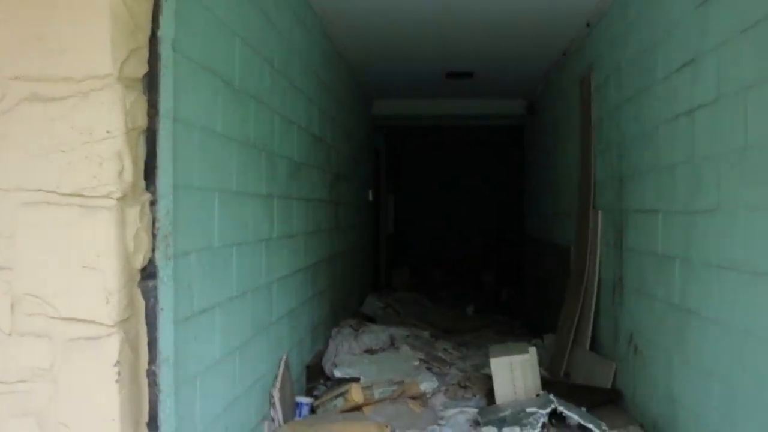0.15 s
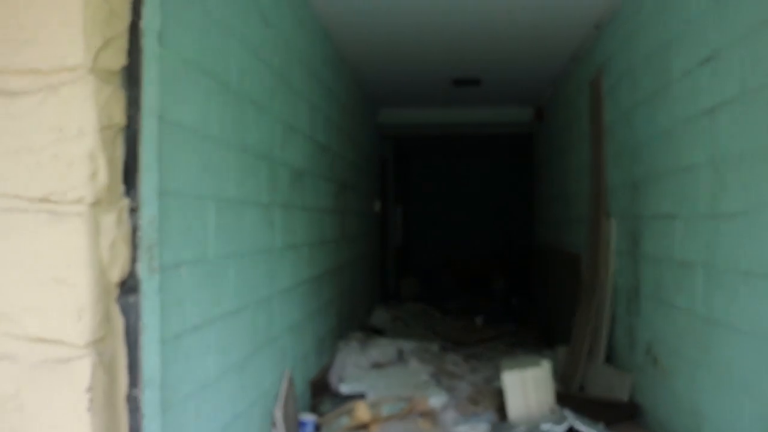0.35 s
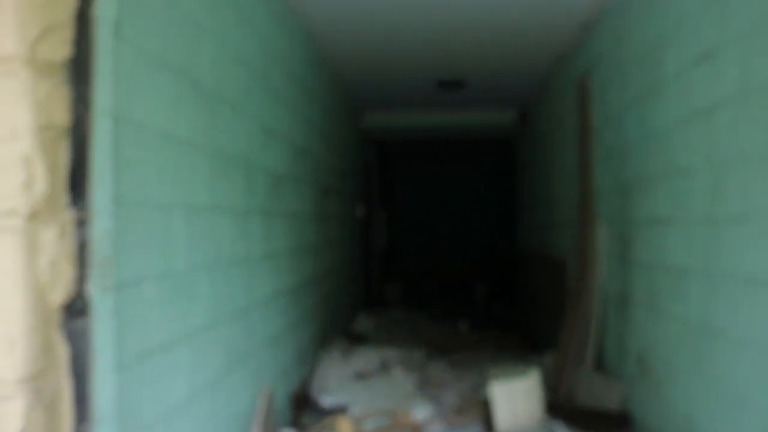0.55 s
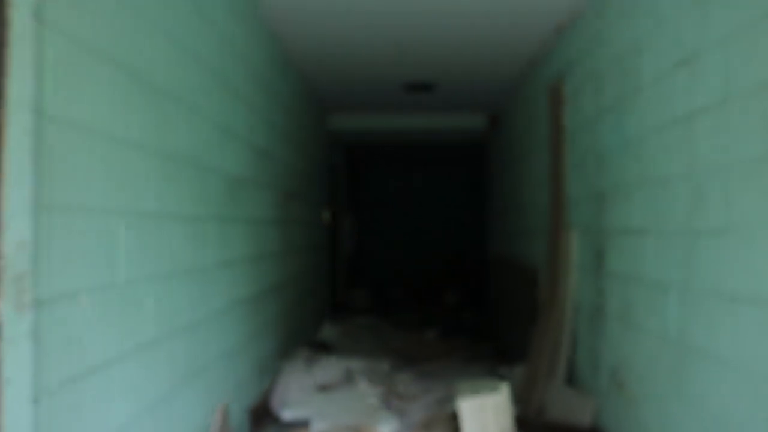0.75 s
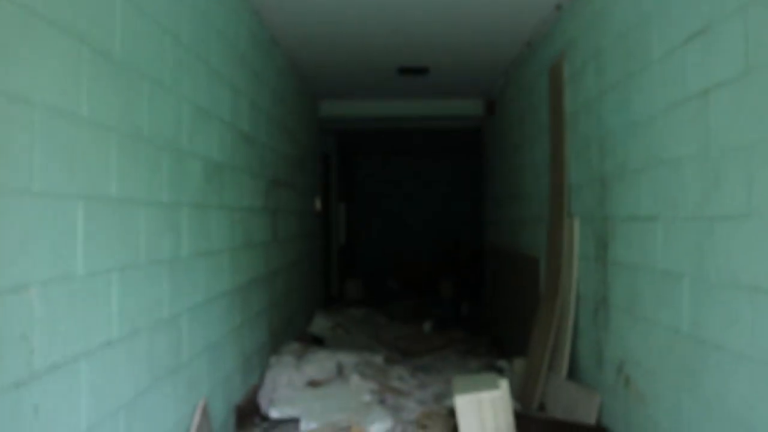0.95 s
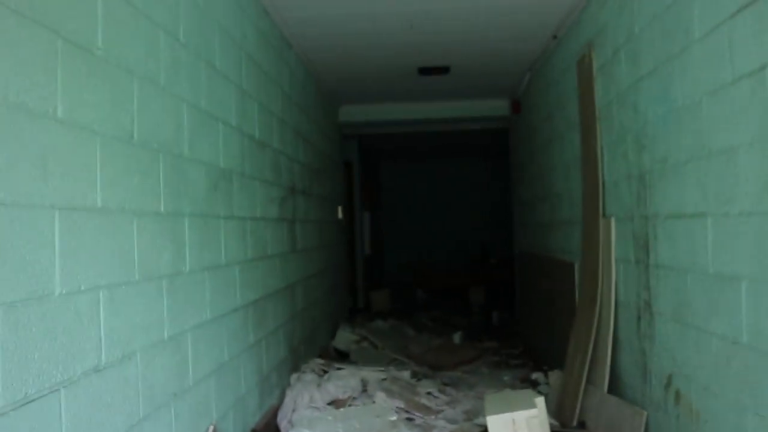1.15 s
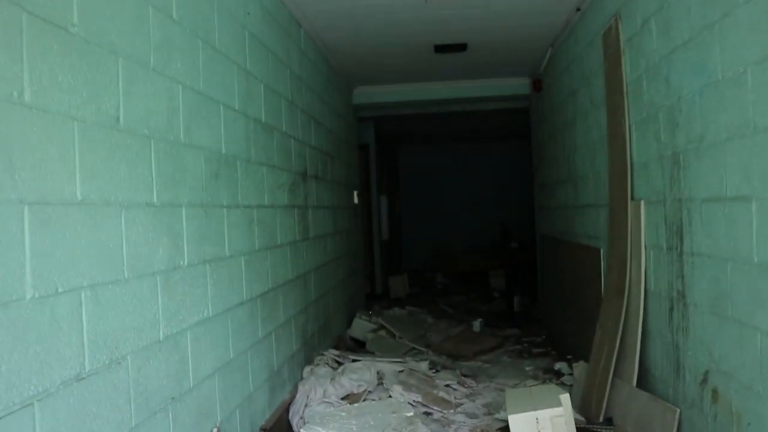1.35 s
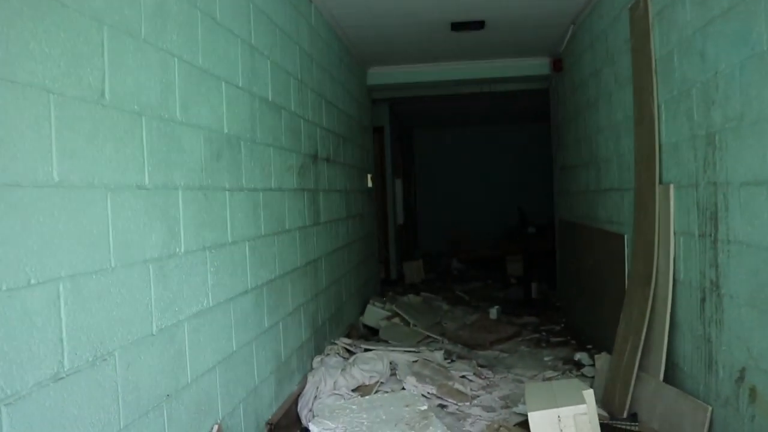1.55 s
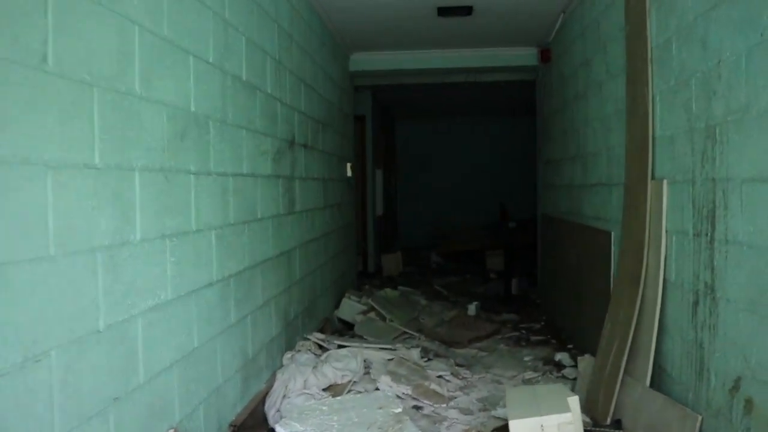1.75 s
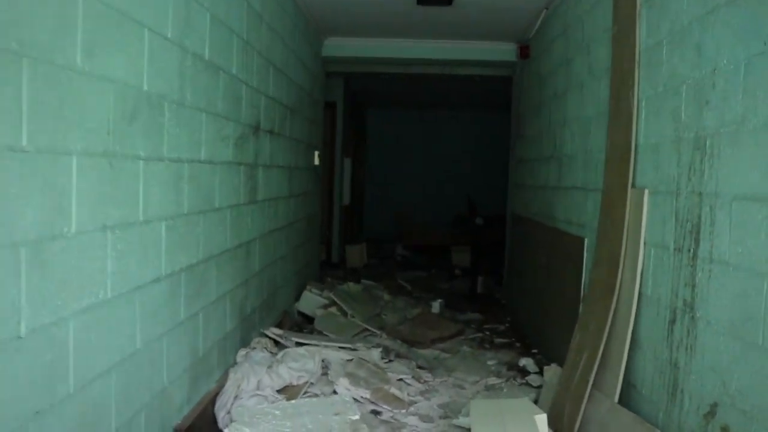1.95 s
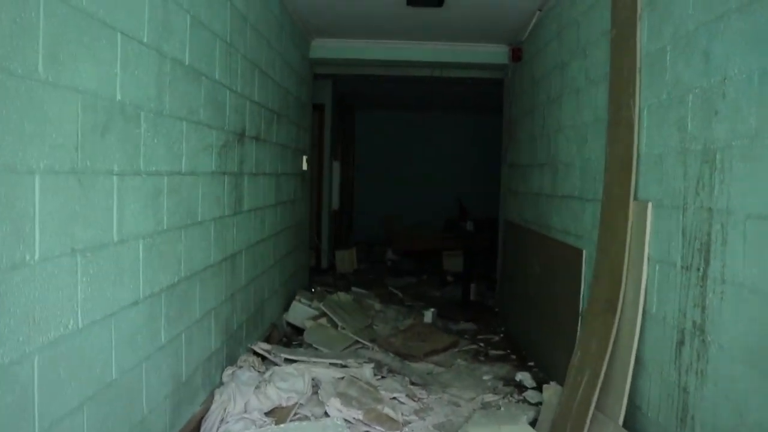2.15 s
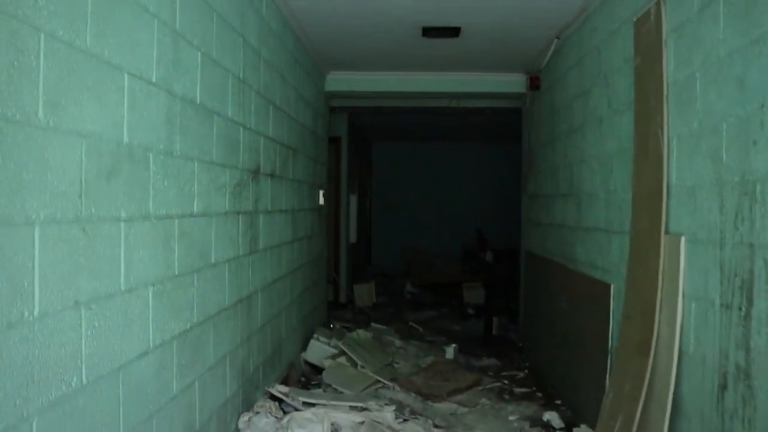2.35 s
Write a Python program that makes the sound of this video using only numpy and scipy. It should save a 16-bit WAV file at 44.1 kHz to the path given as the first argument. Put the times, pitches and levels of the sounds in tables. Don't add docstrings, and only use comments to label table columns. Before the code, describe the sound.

Slow steps crack debris and send broken glass tinkling inside a hard-walled, derelict hallway.

```python
import sys
import numpy as np
from scipy import signal
from scipy.fft import rfft, irfft, next_fast_len
from scipy.io import wavfile

SR = 44100
rng = np.random.default_rng(int(sys.argv[2]) if len(sys.argv) > 2 else 0)


def field_ratio(decibels):
    return 10 ** (np.asarray(decibels, dtype=float) / 20)


def put_to_file(sound):
    columns = np.atleast_2d(sound).T
    safe = np.clip(columns, -1, 1)
    whole_steps = np.round(safe * 32767)
    wavfile.write(sys.argv[1], SR, whole_steps.astype(np.int16))


N = 110250

GRIT_ALIKE_HZ = 2600


def rms_one(x):
    return x / np.sqrt(np.mean(x ** 2) + 1e-20)


def at_hz(points, hz, column=1):
    p = np.array(points)
    return np.interp(np.log(np.maximum(hz, 1)), np.log(p[:, 0]), p[:, column])


def flicker(rate, size, count):
    knots = rng.standard_normal((count, 60))
    t = np.arange(size) / SR
    return np.array([np.interp(t * rate, np.arange(len(k)), k) for k in knots])


def drift(rate):
    knots = rng.standard_normal(200)
    return np.interp(np.arange(N) / SR * rate, np.arange(len(knots)), knots)


def ring(clicks, hz, t60):
    radius = field_ratio(-60 / (t60 * SR))
    angle = 2 * np.pi * min(hz, 19000) / SR
    poles = [1, -2 * radius * np.cos(angle), radius * radius]
    return signal.lfilter([0, np.sin(angle)], poles, clicks + 1e-18)


def band(x, low_hz, high_hz):
    edges = [max(low_hz, 10), min(high_hz, 19800)]
    return signal.sosfilt(signal.butter(2, edges, "band", fs=SR, output="sos"), x)


def add(out, s, x, pan_db):
    i = int(s * SR)
    x = x[..., max(-i, 0):N - i]
    start = max(i, 0)
    out[:, start:start + x.shape[-1]] += x * field_ratio(np.array([[pan_db / 2], [-pan_db / 2]]))


# start t/s, length t/s, level/dB, centre f/Hz, width/octaves
SCUFF_EVENTS = [(-.02, 0.035, -36.5, 3300, 1.6), (.2405, 0.011, -28.5, 3850, 0.14),
                (.245, 0.077, -29, 5000, 1.64), (0.252, 0.049, -31, 990, 0.74),
                (0.404, 0.061, -30.5, 5480, 0.23), (0.39, 0.047, -32, 7450, 0.33),
                (0.399, 0.067, -41, 11300, 0.22), (.4, 0.048, -33.5, 2230, 0.4),
                (0.578, 0.0076, -27.5, 3430, 1.66), (0.823, 0.023, -43, 5000, 1.23),
                (1.069, 0.27, -48, 3020, 2.36), (1.194, 0.0094, -34, 5930, 0.48),
                (1.207, 0.052, -44.5, 4200, 1.16), (1.39, 0.056, -50, 449, 0.038),
                (1.51, 0.074, -55.5, 460, 0.035), (1.424, 0.013, -48, 11500, 0.13),
                (1.458, 0.027, -47.5, 530, 0.38), (1.638, 0.0067, -45, 1930, 0.77),
                (1.831, 0.013, -39.5, 367, 0.93), (1.797, 0.074, -49, 7000, 1.34),
                (1.882, 0.037, -45.5, 1180, 1.5), (2.0, 0.016, -46, 1500, 1.9),
                (2.056, 0.034, -50.5, 7850, 1.13), (2.097, 0.0067, -49, 1500, 0.65)]
SCUFF_RISE, SCUFF_FALL_S = 0.14, 0.021
GRAINS_PER_S, GRAIN_SPREAD_DB, GRAIN_CYCLES = 7000, 2, 10
CLUMP_DB, CLUMPS_PER_S = 4.5, 90
GRIT_TOP_HZ = 14500


def scuffs():
    out, size = np.zeros((2, N)), SR // 6
    t = np.arange(size) / SR
    draws = rng.random((len(SCUFF_EVENTS), 4, 3, size))
    steps = np.linspace(-1.5, 1.5, 10)
    for (s, length, db, hz, octaves), (born, big, sign, dealt) in zip(SCUFF_EVENTS, draws):
        sizes = field_ratio(-GRAIN_SPREAD_DB * np.log(np.maximum(big, 0.02)))
        grains = (born < GRAINS_PER_S / SR) * sizes * np.sign(sign - 0.5)
        rise = np.clip(t / (SCUFF_RISE * length), 0, 1)
        fall = np.exp(-np.maximum(t - length, 0) / SCUFF_FALL_S)
        grains = grains * rise * fall
        dealt = (dealt * len(steps)).astype(int)
        cycles = GRAIN_CYCLES / np.sqrt(octaves)
        clumps = field_ratio(CLUMP_DB * flicker(CLUMPS_PER_S, size, len(steps)) - CLUMP_DB / 2)
        grit = 0
        for k, step in enumerate(steps):
            pitch = min(hz * 2 ** (step * octaves), 15500)
            unit = np.sqrt(GRAINS_PER_S / len(steps) * cycles / pitch / 5)
            weight = np.exp(-step ** 2 / 2) / unit / (1 + (pitch / GRIT_TOP_HZ) ** 8)
            rung = ring(grains * clumps[k] * (dealt == k), pitch, cycles / pitch) * weight
            own = 1 / (1 + (GRIT_ALIKE_HZ / pitch) ** 2)
            grit = grit + np.sqrt(1 - own) * rung[0] + np.sqrt(own) * rung[1:]
        reach = 2 ** (1.5 * octaves + 0.5)
        add(out, s, field_ratio(db) * band(grit, hz / reach, hz * reach), 0)
    return out


# t/s, peak level/dB, f/Hz, ring/cycles, pan/dB
SNAP_EVENTS = [(.007, -16.5, 5900, 4, -1), (0.2338, -27, 3540, 7.8, -2), (0.2652, -15, 750, 5.2, 0),
               (0.3952, -4, 1048, 8.3, 1), (.397, -7.5, 2310, 5.7, 5.5), (0.4199, -13, 1297, 19, 7),
               (.450, -12, 1270, 11, 1), (0.5837, -23, 300, 2.1, 0.1), (0.5832, -3, 4800, 2.6, 7),
               (.5905, -24, 2050, 7.1, -12), (1.1987, -8.5, 5600, 4.9, -.5), (1.204, -18, 1080, 3.55, 2),
               (1.508, -28.5, 6500, 7.1, -4), (1.646, -26, 2300, 4.1, 3), (1.710, -30, 7540, 5.2, 3),
               (1.7495, -17.5, 7700, 6.6, -2), (1.818, -28, 1400, 3.3, 17), (1.824, -25.5, 1400, 5.2, -4),
               (1.841, -24, 300, 2, 1), (1.934, -13, 7420, 10, -10.5), (2.027, -30, 10800, 6.5, -6),
               (2.051, -31, 9000, 6.6, 6), (2.065, -29.5, 8400, 7.4, -15)]
CRACK_DB = -6.5


def snaps():
    out, click = np.zeros((2, N)), np.eye(1, 2000)[0]
    for s, db, hz, cycles, pan_db in SNAP_EVENTS:
        t60 = cycles / hz
        body = ring(ring(click, hz, t60), hz * 1.094, t60)
        crack = band(click, hz / 2, hz * 2.5)
        snap = body / np.abs(body).max() + field_ratio(CRACK_DB) * crack / np.abs(crack).max()
        add(out, s, field_ratio(db) * snap, pan_db)
    return out


SHARD_MODES_HZ = [1443, 2541, 2568, 3660, 3686, 5195, 6654, 6939, 7348, 9030, 10290, 10750, 12900, 14520]
# level/dB, t60/s
SHARD_RINGING = [(3.5, 0.29), (-1, 0.14), (-4, .2), (-9, 0.44), (-6, 0.22), (5, 0.1), (1, 0.11), (-9, 0.11),
                 (-6, 0.17), (-5, 0.11), (-6.5, 0.097), (-3, 0.19), (-6, 0.29), (-18, .1)]
# t/s, level/dB, most excited f/Hz, reach/octaves, free
# ringing t/s
SHARD_BOUNCES = [(.408, -22, 12900, .08, .11), (0.413, -31, 8200, 0.3, .07), (.47, -35.5, 3700, 0.11, .09),
                 (0.5552, -18, 2510, 0.35, 0.021), (0.5574, -35.5, 9500, 0.84, 0.022),
                 (.563, -24.5, 1443, 0.21, .115), (0.5821, -23.5, 10400, 0.19, .16),
                 (.590, -19.5, 6870, 0.19, .1), (.612, -25, 3700, .12, 0.084),
                 (.635, -37.5, 2480, .1, 0.042), (.702, -27.5, 2570, .2, 0.046),
                 (.709, -39, 4650, 0.47, 0.018), (0.8224, -35.5, 4800, 0.19, .075),
                 (0.8232, -32, 8850, 0.26, 0.033), (.829, -35, 3110, 0.27, 0.021)]
SHARD_CHANCE_DB, SHARD_CLICK_DB, CHATTER_S, CHOKE_S = 1.5, 17, 0.00076, 0.004
RATTLE, RATTLE_PER_S, RATTLE_HZ = 1.4, 160, 6500


def shard():
    out, t = np.zeros((2, N)), np.arange(SR // 3) / SR
    hz = np.array(SHARD_MODES_HZ)
    mode_db, t60 = np.transpose(SHARD_RINGING)
    decay = field_ratio(-60 * t / t60[:, None])
    rattle_share = RATTLE / (1 + (RATTLE_HZ / hz[:, None]) ** 2)
    chance = rng.standard_normal((len(SHARD_BOUNCES), 3, len(hz)))
    for (s, db, centre, reach, free), (luck, phase, apart) in zip(SHARD_BOUNCES, chance):
        nearness = np.exp(-0.5 * (np.log2(hz / centre) / reach) ** 2)
        gain = field_ratio(db + mode_db + SHARD_CHANCE_DB * luck) * nearness
        lead = 0.6 * apart / (1 + (GRIT_ALIKE_HZ / hz) ** 2) * np.array([[1], [-1]])
        waves = np.sin(2 * np.pi * hz[:, None] * t + (np.pi * phase + lead)[..., None]) * decay
        waves = waves * (1 + rattle_share * flicker(RATTLE_PER_S, len(t), len(hz)))
        shape = (1 - np.exp(-t / CHATTER_S)) * np.exp(-np.maximum(t - free, 0) / CHOKE_S)
        click = np.eye(1, len(t))[0]
        tick = field_ratio(db + SHARD_CLICK_DB) * band(click, centre / 3, centre * 1.63)
        add(out, s, gain @ waves * shape + tick, 0)
    return out


# f/Hz, t60/s, level/dB
HALL_DECAY = [(300, 0.31, -4.5), (1500, .4, -5.5), (5000, 0.47, -2), (14200, 0.17, 1.5)]
HALL_BUILD_S, HALL_ALIKE_HZ = 0.0023, 1500
FLUTTER_S, FLUTTER_DB, FLUTTER_LOSS_DB = 0.0077, -6, -1
FLUTTER_LOW_HZ, FLUTTER_HIGH_HZ = 540, 2370
PORT_LAG_S = 0.00003


def corridor(x):
    size, t = next_fast_len(N + SR), np.arange(SR // 2) / SR
    hz = np.fft.rfftfreq(size, 1 / SR)
    high_pass = (1j * hz / FLUTTER_LOW_HZ) / (1 + 1j * hz / FLUTTER_LOW_HZ)
    walls = high_pass / (1 + 1j * hz / FLUTTER_HIGH_HZ)
    lag = np.exp(-2j * np.pi * hz * FLUTTER_S)
    again = field_ratio(FLUTTER_LOSS_DB) * np.abs(walls) * lag
    flutter = field_ratio(FLUTTER_DB) * walls * lag / (1 - again)
    white, tail = rng.standard_normal((3, len(t))), 0
    for centre in 125 * 2. ** np.arange(8):
        own = np.clip(centre / HALL_ALIKE_HZ / 2, 0, 1)
        noise = np.sqrt(1 - own) * white[0] + np.sqrt(own) * white[1:]
        noise = band(noise, centre / np.sqrt(2), centre * np.sqrt(2))
        decay_db = at_hz(HALL_DECAY, centre, column=2) - 60 * t / at_hz(HALL_DECAY, centre)
        tail = tail + noise * field_ratio(decay_db)
    tail = tail * (1 - np.exp(-(t / HALL_BUILD_S) ** 2)) / np.sqrt(SR / 40)
    ports = np.exp(-1j * np.pi * hz * PORT_LAG_S * np.array([[1], [-1]]))
    early = rfft(x, size) * (1 + flutter) * ports
    late = rfft(x.mean(0), size) * rfft(tail, size)
    return irfft(early + late, size)[:, :N]


# t/s, level/dB
AIR_LEVEL = [(0.0, -44), (0.3, -42.5), (0.45, -42.5), (0.77, -44), (1.86, -45), (2.12, -48), (2.5, -48)]
# f/Hz, density level/dB
AIR_SPECTRUM = [(18, -46), (30, -9), (79, -6.5), (512, -9), (600, -9), (822, -7), (3220, -18.5),
                (6050, -21.5), (16000, -38.5)]
# f/Hz, correlation/1
AIR_LIKENESS = [(60, 0.78), (240, 0.98), (950, 0.29), (3770, -0.49), (15000, 0.32)]
AIR_PATCHY_DB = 2.22
INSECT_HZ, INSECT_WIDTH_HZ, INSECT_DB = 6010, 860, -52
HUM_HZ, HUM_WIDTH_HZ, HUM_DB = 81, 31, -54.5


def air():
    level_db = np.interp(np.arange(N) / SR, *np.transpose(AIR_LEVEL))
    edges, white = 30 * 2 ** np.arange(0, 9.6, 0.5), rng.standard_normal((4, 2, N))
    field = 0
    for k, (low, high) in enumerate(zip(edges, edges[1:])):
        mid, side = band(white[k % 2], low, high)
        hz = np.sqrt(low * high)
        alike = np.clip(at_hz(AIR_LIKENESS, hz), -1, 1)
        stereo = np.sqrt(1 + alike) * mid + np.sqrt(1 - alike) * side * [[1], [-1]]
        field = field + field_ratio(at_hz(AIR_SPECTRUM, hz) + AIR_PATCHY_DB * drift(15)) * stereo
    insects = white[2] - 0.11 * white[2, ::-1]
    insects = rms_one(band(insects, INSECT_HZ - INSECT_WIDTH_HZ / 2, INSECT_HZ + INSECT_WIDTH_HZ / 2))
    hum = white[3, 0] + 0.3 * white[3]
    hum = rms_one(band(hum, HUM_HZ - HUM_WIDTH_HZ / 2, HUM_HZ + HUM_WIDTH_HZ / 2))
    insect_db = INSECT_DB + level_db - level_db.mean() + 1.2 * drift(26.7)
    return field_ratio(level_db + 0.5) * rms_one(field) + field_ratio(insect_db) * insects + field_ratio(HUM_DB) * hum


def scene():
    low_cut = signal.butter(2, 198, "high", fs=SR, output="sos")
    contacts = signal.sosfilt(low_cut, scuffs() + snaps() + shard())
    return corridor(contacts) + air()


def band_limit(x):
    return signal.sosfilt(signal.butter(12, 16320, fs=SR, output="sos"), x)


def record(dry):
    dull = signal.sosfilt(signal.butter(2, 17200, fs=SR, output="sos"), dry)
    dull = signal.sosfilt(signal.cheby2(12, 60, 16400, fs=SR, output="sos"), dull)
    return band_limit(np.clip(dull, -1, 1))


dry = scene()
out = record(dry)
put_to_file(out)
```